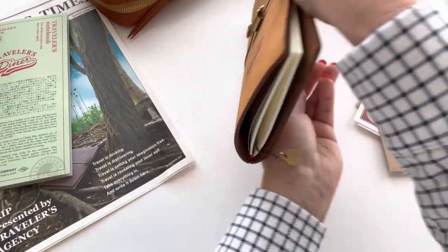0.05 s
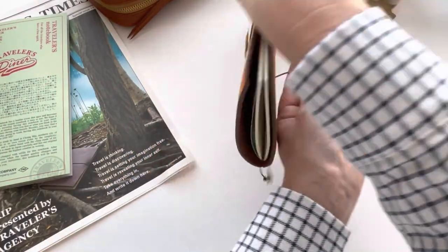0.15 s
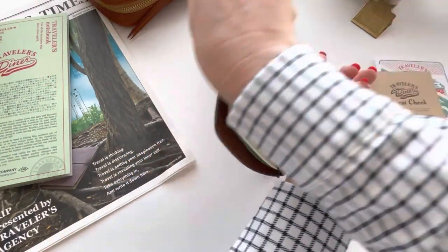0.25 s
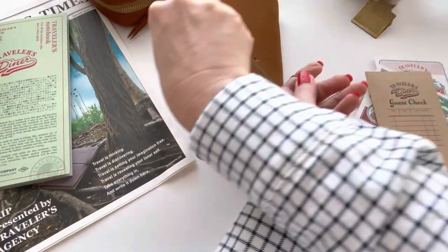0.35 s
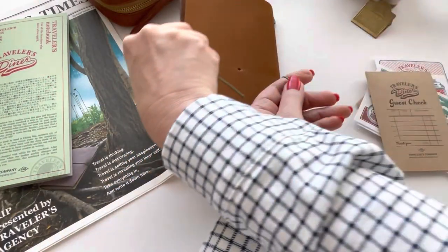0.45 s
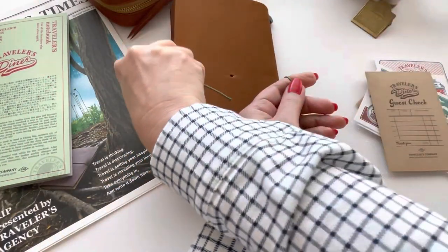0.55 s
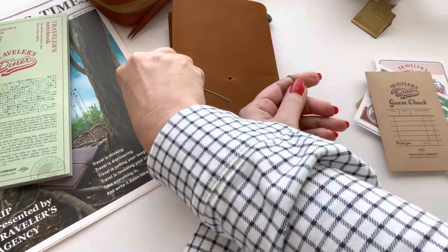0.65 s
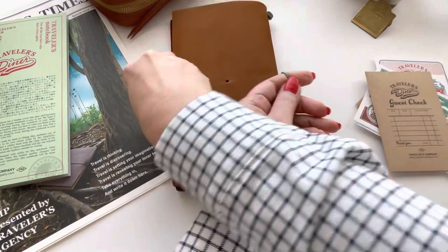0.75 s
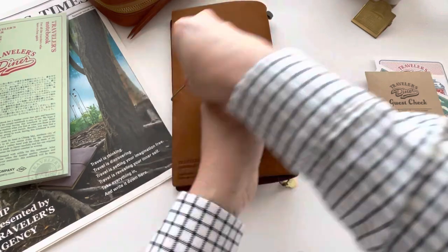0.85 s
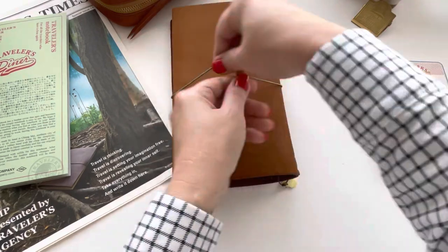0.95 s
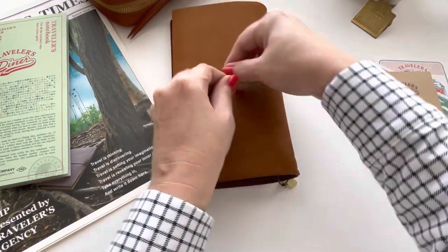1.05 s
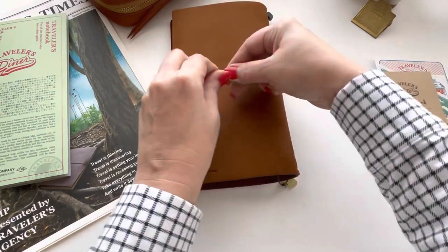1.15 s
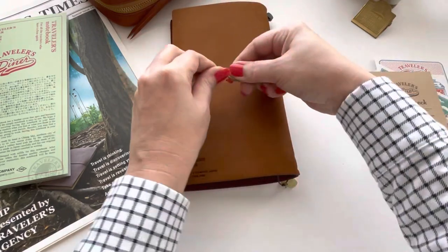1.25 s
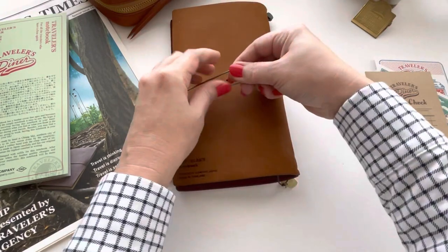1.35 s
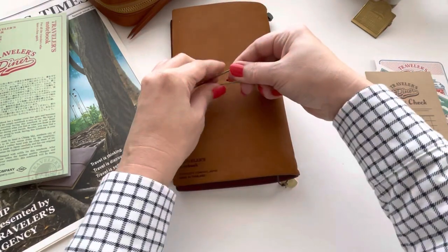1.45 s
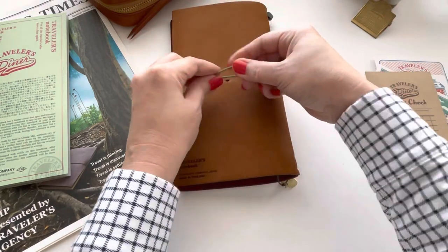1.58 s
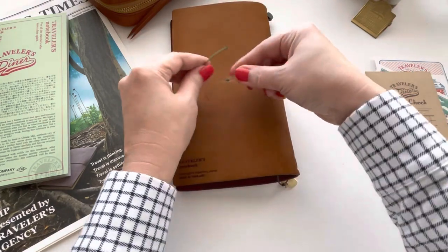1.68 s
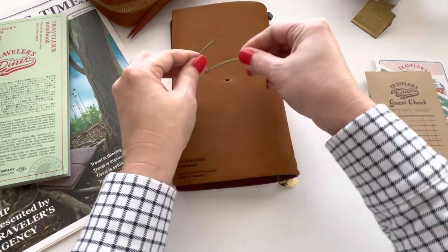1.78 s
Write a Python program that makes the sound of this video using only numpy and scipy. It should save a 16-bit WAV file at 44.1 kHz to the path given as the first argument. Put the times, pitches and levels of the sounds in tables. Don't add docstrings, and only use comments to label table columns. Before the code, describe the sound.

A leather notebook is put down on a desk, heard close in a quiet room. Soft leather rubbing and a tiny squeak lead to a tight clatter of knocks and metal ticks at 0.2-0.35 s, with pages shuffling until 0.5. At 0.71-0.75 a click, scrape and dull wrist thump. A thin, high cord hiss follows near 0.93, tiny taps around 1.1, a faint slip at 1.56, over low room hum.

```python
import sys
import numpy as np
from scipy import signal
from scipy.fft import rfft, irfft, next_fast_len
from scipy.io import wavfile
from scipy.ndimage import uniform_filter1d

SR = 44100
rng = np.random.default_rng(int(sys.argv[2]) if len(sys.argv) > 2 else 0)


def ratio(d):
    e = np.asarray(d, float) / 20
    return 10 ** e


def persist_wave(psi):
    counts = np.round(np.clip(psi, -1, 1) * 32767).astype(np.int16)
    wavfile.write(sys.argv[1], SR, np.atleast_2d(counts).T)


N = 79380

# pitch_hz, likeness (1 = identical, -1 = opposite)
STEREO_LIKENESS = [(30, 0.61), (100, 0.85), (400, 0.55), (1000, 0.26), (3000, -0.11), (9000, -0.11),
                   (14000, 0.68)]


def unit(x):
    return x / np.sqrt(np.mean(x ** 2) + 1e-20)


def along(points, hz):
    point_hz, value = np.transpose(points)
    return np.interp(np.log(hz + 1), np.log(point_hz + 1), value)


def stereo_angle(hz):
    return np.arccos(np.clip(along(STEREO_LIKENESS, hz), -1, 1)) / 2


def filtered(x, response):
    size = next_fast_len(N + SR // 2)
    spectrum = rfft(x, size) * response(np.fft.rfftfreq(size, 1 / SR))
    return irfft(spectrum, size)[..., :N]


def band(x, hz, share):
    edges = np.clip([hz * (1 - share / 2), hz * (1 + share / 2)], 50, 0.45 * SR)
    return signal.sosfilt(signal.butter(2, edges, "band", fs=SR, output="sos"), x)


def swell(peak_s, rise_s, fall_s):
    t = np.arange(N) / SR - peak_s
    rise = np.exp(-2 * (t / rise_s) ** 2)
    fall = np.exp(-2 * np.abs(t / fall_s) ** 1.09)
    return np.where(t < 0, rise, fall)


def rush(spectrum, patchy_db, grain_db):
    cells = signal.stft(rng.standard_normal((2, N + 512)), nperseg=512)[2]
    patches = uniform_filter1d(rng.standard_normal(cells.shape[1:]), size=6, axis=0)
    patches = unit(uniform_filter1d(patches, size=4, axis=1))
    pair = signal.istft(cells * ratio(patchy_db * patches), nperseg=512)[1][:, :N]
    grain = unit(uniform_filter1d(rng.standard_normal(N), size=90))
    pair = pair * ratio(grain_db * grain)

    def color(hz):
        angle = stereo_angle(hz)
        return ratio(along(spectrum, hz)) * [np.cos(angle), np.sin(angle)]

    mid, side = filtered(pair, color)
    return unit(np.array([mid + side, mid - side]))


def knocks():
    # start_s, peak_db, hardness_hz (centre), reach_octaves, ring_factor (length)
    contacts = [(.2126, -26.5, 1260, 1.3, 0.87), (.2155, -21.5, 1390, 0.37, 0.34),
                (.2175, -25, 410, 0.18, 0.44), (.241, -37, 1520, .5, 1), (.2598, -19, 1050, 0.44, 0.58),
                (.2612, -20, 572, 0.49, 0.72), (.2652, -27.5, 880, 0.36, 1),
                (.2853, -28.5, 1130, 2.4, 0.77), (.2881, -22, 1720, 0.24, 1),
                (.2885, -26.5, 735, 0.78, 0.44), (.2943, -27.5, 889, 0.74, .5),
                (.2968, -31.5, 1217, 0.79, 0.3), (.304, -30, 1580, 0.5, 0.33), (.339, -38, 750, 0.18, 0.65),
                (.345, -30, 1620, 0.13, 0.47), (.343, -25.5, 318, 0.26, 1), (.371, -31.5, 383, 0.29, 0.19),
                (.4268, -34, 1626, 0.1, 0.75), (.429, -41, 870, 0.58, 0.58), (.440, -42.5, 1650, 0.13, 1),
                (.4755, -42.5, 860, 0.14, 0.32), (.519, -56, 810, 0.79, 0.79), (.68, -57, 1370, 0.29, .6),
                (.7138, -38.5, 1780, 1.34, 0.18), (.7278, -38, 1750, 0.27, 0.1), (.737, -48, 1650, 2, 0.43),
                (.7425, -27, 1060, 0.27, 0.14), (.7452, -30, 407, 0.29, 0.2), (.789, -52, 2000, 1.2, 0.6),
                (1.068, -53.5, 1150, 0.28, 0.43), (1.09, -51.5, 505, 0.62, 0.23),
                (1.119, -58.5, 345, 0.54, 0.52)]
    # pitch_hz, level_db, t60_s
    body_modes = [(228, 1, 0.107), (355.6, -0.5, 0.05), (420.3, 2, 0.082), (527, 4.5, .04),
                  (732, -10, 0.055), (795, 3, .04), (870, -1, .1), (959, 1.5, 0.044), (1185, -1.5, 0.039),
                  (1294, 3, 0.043), (1536, -2, 0.062), (1706, -2, 0.045), (1837, -4, .07),
                  (2110, -2.5, 0.045)]
    hz, level_db, t60_s = np.transpose(body_modes)[:, :, None]
    out, t = np.zeros((2, N + SR)), np.arange(SR // 5) / SR
    for start_s, peak_db, hard_hz, reach_octaves, ring_factor in contacts:
        chance = rng.standard_normal((3, len(body_modes), 1))
        noise = rng.standard_normal((2, len(t)))

        reach_db = -6 * (np.log2(hz / hard_hz) / reach_octaves) ** 2
        scatter_db = 1.5 * chance[0]
        modes = ratio(level_db + reach_db + scatter_db - 60 * t / (t60_s * ring_factor))
        phase = 2 * np.pi * hz * (1 + 0.012 * chance[1]) * t
        apart = 0.37 * np.tanh(hz / 1400) * (1 + 1.8 * chance[2])
        ring = np.array([(modes * np.sin(phase + side * apart)).sum(0) for side in (1, -1)])
        ring = ring * (1 - np.exp(-t * hard_hz / 0.46))

        crack = (noise[0] + 0.7 * noise[::-1]) * ratio(-16 - 60 * t / 0.006)
        crack = band(crack, hard_hz, 0.22) * np.sqrt(SR / hard_hz / 4)
        softness = signal.butter(4, 2.01 * hard_hz, fs=SR, output="sos")
        hit = signal.sosfilt(softness, ring + crack)
        out[:, round(start_s * SR):][:, :len(t)] += ratio(peak_db + 3) * hit
    no_bass = signal.butter(4, 293.7, "high", fs=SR, output="sos")
    return signal.sosfilt(no_bass, out[:, :N])


def ticks():
    # start_s, peak_db, pitch_hz, width_share (of pitch), t60_s
    charm_ticks = [(0.212, -32.5, 14400, .58, .0075), (0.2136, -36, 4470, 0.57, 0.015),
                   (0.215, -33, 13000, 0.34, 0.0099), (0.2595, -18, 15900, 0.19, 0.0084),
                   (.2596, -30.5, 4200, 0.66, 0.015), (0.2598, -43.5, 6500, 0.36, 0.0099),
                   (.269, -57, 14600, .2, 0.0068), (0.2852, -28, 14600, 0.18, 0.0067),
                   (.2858, -23.5, 3370, 1, 0.0067), (0.2882, -19, 4480, 0.28, 0.0071),
                   (0.2884, -19.5, 3170, 0.33, 0.03), (0.296, -33, 5490, .7, 0.0097),
                   (.301, -33, 3290, 0.27, 0.014), (0.35, -40.5, 3160, 0.21, 0.029),
                   (0.429, -48, 3000, 0.46, .005), (0.7142, -22.5, 4770, 1.1, 0.0015),
                   (.7143, -38, 7200, 0.13, 0.0052), (0.724, -35, 10000, 0.53, .006),
                   (.7272, -32.5, 7940, 0.35, .005), (0.726, -34.5, 3460, 0.23, 0.0055),
                   (.7305, -42, 7000, 1, .004), (0.7358, -39, 7000, 0.91, 0.0046),
                   (0.737, -36, 3470, 0.31, .006), (0.787, -56, 7160, 0.13, 0.0085),
                   (0.789, -51, 3030, 0.44, 0.011), (1.099, -55, 4500, 1.3, .006)]
    out, t = np.zeros((2, N + SR)), np.arange(SR // 50) / SR
    for start_s, peak_db, pitch_hz, width_share, t60_s in charm_ticks:
        noise = rng.standard_normal((2, len(t)))
        angle = stereo_angle(pitch_hz)
        pair = np.cos(angle) * noise[0] + np.sin(angle) * noise[1] * [[1], [-1]]
        burst = band(pair * ratio(-60 * t / t60_s), pitch_hz, width_share)
        out[:, round(start_s * SR):][:, :len(t)] += ratio(peak_db) * burst / np.abs(burst).max()
    return out[:, :N]


def thumps():
    # start_s, level_db
    blows = [
        (.228, -28),
        (0.267, -50),
        (0.345, -34),
        (.386, -40),
        (0.526, -48),
        (.7468, -29),
    ]
    # pitch_hz, level_db, t60_s, rise_s
    desk_modes = [(90.7, -7.5, 0.15, 0.0098), (184.3, 15.5, 0.081, 0.022), (376, -21, .06, 0.017),
                  (49.5, -25.5, 0.32, .01)]
    out, t = np.zeros(N + SR), np.arange(SR // 2) / SR
    for start_s, blow_db in blows:
        for pitch_hz, level_db, t60_s, rise_s in desk_modes:
            fade = ratio(level_db + rng.normal(0, 1) - 60 * t / t60_s)
            onset = (1 - np.exp(-t / rise_s)) ** 2
            ring = fade * np.sin(2 * np.pi * pitch_hz * t) * onset
            out[round(start_s * SR):][:len(t)] += ratio(blow_db) * ring
    return out[:N]


def rubbing():
    # peak_s, rise_s, fall_s, leather_db, skin_db
    strokes = [(0.029, 0.1, 0.13, -67.5, -60), (0.139, 0.007, 0.036, -57.5, -62.5),
               (0.194, 0.068, 0.059, -50, -50), (0.29, 0.0018, 0.042, -55, -54),
               (.318, 0.012, 0.032, -48.5, -55), (.347, 0.0063, 0.031, -44.5, -59),
               (0.474, .02, 0.011, -57.5, -89), (0.522, 0.011, 0.032, -60, -89),
               (0.592, 0.035, 0.032, -59, -92), (0.682, 0.008, 0.03, -60.5, -74),
               (0.721, 0.013, 0.044, -41.5, -46), (.86, 0.058, 0.088, -63.5, -66),
               (0.934, 0.056, 0.037, -58, -61.5), (1.028, 0.092, 0.055, -83, -86),
               (1.09, 0.035, 0.047, -64, -71.5), (1.198, 0.083, 0.082, -69.5, -79.5),
               (1.561, 0.014, .025, -78, -76), (1.619, 0.023, 0.042, -65, -78),
               (1.686, 0.01, 0.013, -64, -84), (1.785, 0.11, 0.052, -69.5, -77.5)]
    # pitch_hz, density_db (per Hz)
    leather_color = [(250, -27), (1000, -4.5), (1500, 6), (1850, -1), (2350, 1.9), (3400, -7.5),
                     (4500, -35), (9000, -24.5)]
    # pitch_hz, density_db (per Hz)
    skin_color = [(1500, -39), (3000, -2.5), (6000, -8), (9500, -11.5), (12500, -18.5), (15000, -10),
                  (16500, -10)]
    dull = sum(ratio(leather_db) * swell(s, rise, fall) for s, rise, fall, leather_db, _ in strokes)
    bright = sum(ratio(skin_db) * swell(s, rise, fall) for s, rise, fall, _, skin_db in strokes)
    rasp = dull * rush(leather_color, patchy_db=2.0, grain_db=1.5)
    hiss = bright * rush(skin_color, patchy_db=3.5, grain_db=1.5)

    waver_hz = 190 * unit(uniform_filter1d(rng.standard_normal(N), size=60))
    squeak = np.sin(2 * np.pi * np.cumsum(2330 + waver_hz) / SR)
    squeak = squeak * swell(peak_s=0.187, rise_s=0.033, fall_s=0.012)
    return rasp + hiss + ratio(-39.5) * squeak * ratio([[1.5], [-2.5]])


def cord():
    # peak_s, rise_s, fall_s, level_db
    slides = [
        (.15, 0.027, .06, -70),
        (.73, .015, 0.026, -71),
        (.86, .04, 0.056, -73),
        (0.929, 0.058, 0.043, -55.5),
        (1.03, 0.036, 0.045, -69),
        (1.562, 0.025, 0.027, -60),
    ]
    # pitch_hz, density_db (per Hz)
    cord_color = [(6000, -76), (9000, -11.5), (12300, -27.5), (13500, -13), (15400, -5), (16500, -11.5)]
    pull = sum(ratio(level_db) * swell(s, rise, fall) for s, rise, fall, level_db in slides)
    return pull * rush(cord_color, patchy_db=5.5, grain_db=1.5)


def pages():
    # peak_s, rise_s, fall_s, level_db
    settles = [
        (0.246, 0.018, 0.032, -37.5),
        (.277, 0.004, 0.069, -43),
        (0.309, 0.045, 0.04, -34),
        (0.357, 0.077, 0.06, -41),
        (0.443, 0.042, 0.066, -46),
        (0.489, 0.024, 0.27, -63),
        (0.742, 0.024, 0.021, -41.5),
        (0.789, 0.03, 0.01, -59.5),
        (1.081, 1, 0.6, -65.5),
    ]
    # pitch_hz, density_db (per Hz)
    paper_color = [(59, -49), (100, -10), (213, 1.5), (831, -3.5), (1350, -6.5), (1700, -7.5),
                   (4840, -26.5), (9070, -51.5), (15000, -60)]
    shuffle = sum(ratio(level_db) * swell(s, rise, fall) for s, rise, fall, level_db in settles)
    return shuffle * rush(paper_color, patchy_db=1.8, grain_db=1.8)


def room(x):
    # pitch_hz, t60_s
    walls = [(200, 0.063), (2000, 0.083), (10000, 0.072)]
    hz, t, cells = signal.stft(rng.standard_normal((2, SR // 2)), SR, nperseg=256)
    angle = stereo_angle(hz)[:, None]
    sides = np.array([1, -1])[:, None, None]
    cells = np.cos(angle) * cells[0] + np.sin(angle) * cells[1] * sides
    decay = ratio(-60 * t / along(walls, hz)[:, None])
    tail = signal.istft(cells * decay, SR, nperseg=256)[1]
    tail = tail / np.linalg.norm(tail[0])
    late = np.pad(x, (200, 0))[None]
    return signal.fftconvolve(late, tail, axes=1)[:, :N]


def room_hum():
    # pitch_hz, density_db (per Hz)
    hum_color = [(15, -47), (25, -28.5), (118, -2), (172, -7), (617, -16), (726, -18.5), (927, -24),
                 (11600, -36.5), (16500, -42.5)]
    return ratio(-64.5) * rush(hum_color, patchy_db=2.0, grain_db=-1.0)


def scene():
    near = knocks() + ticks() + thumps() + rubbing() + cord() + pages()
    return near + ratio(-11.5) * room(near.mean(0)) + room_hum()


def top_cut(x):
    return signal.sosfilt(signal.butter(12, 17360, fs=SR, output="sos"), x)


def record(dry):
    def treble_loss(hz):
        slope = np.exp(np.clip((15900 - hz) / 116.8, -50, 50))
        shelf_db = -38 / (1 + slope)
        return ratio(shelf_db - 60 * (hz > 17300))

    mix = filtered(dry, treble_loss) * ratio([[-1.65], [1.65]])
    return top_cut(mix)


dry = scene()
out = record(dry)
persist_wave(out)
```